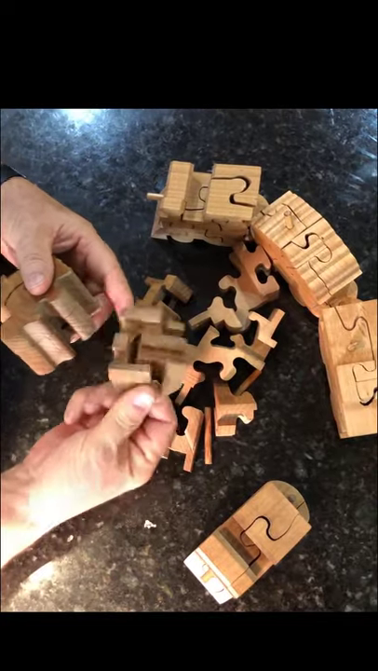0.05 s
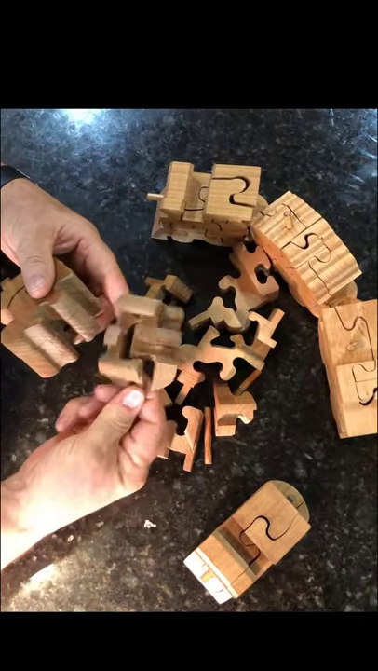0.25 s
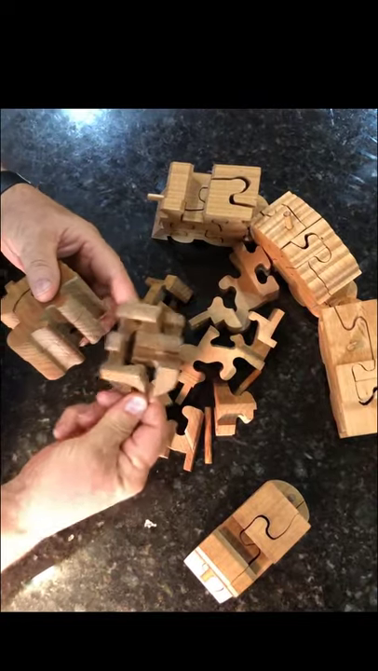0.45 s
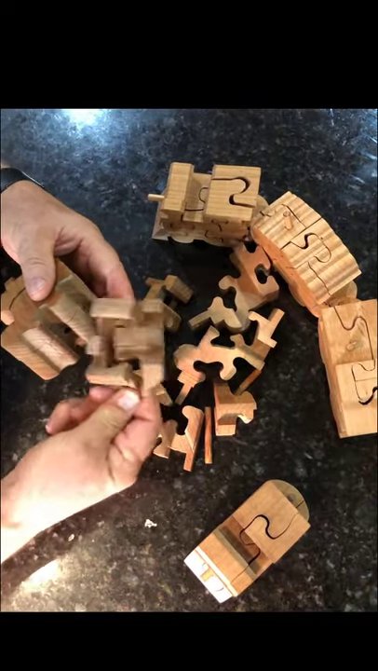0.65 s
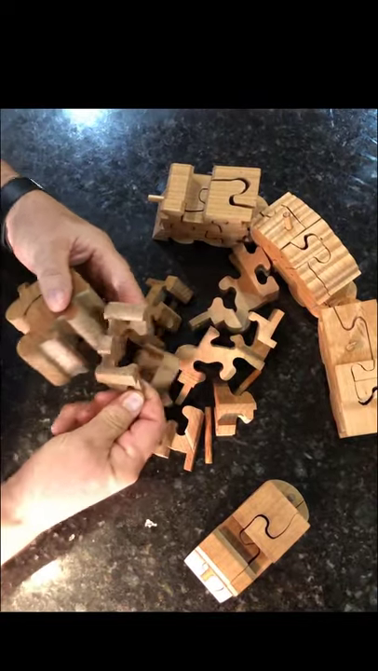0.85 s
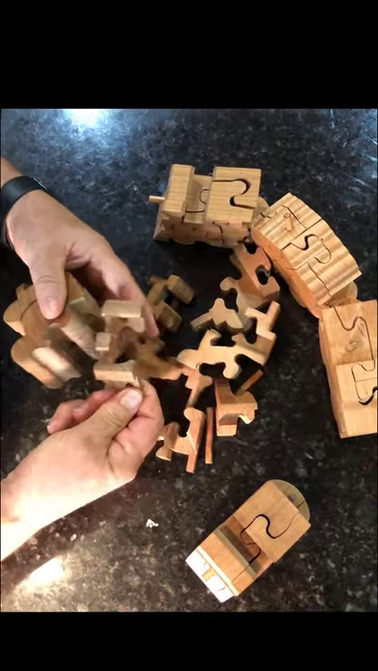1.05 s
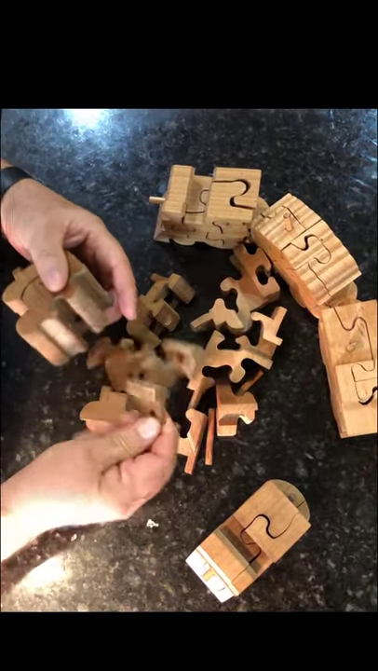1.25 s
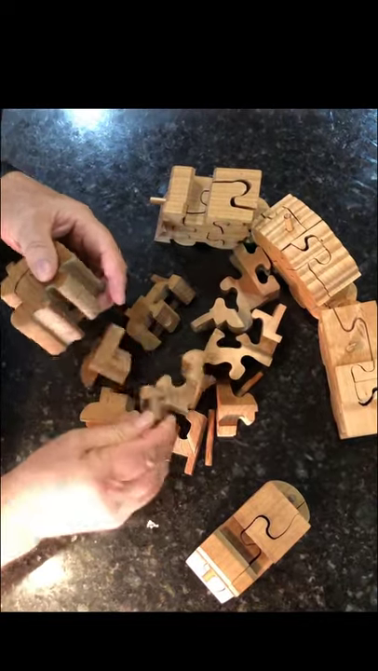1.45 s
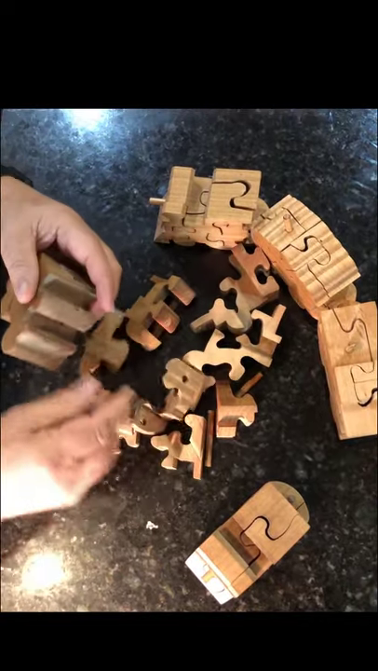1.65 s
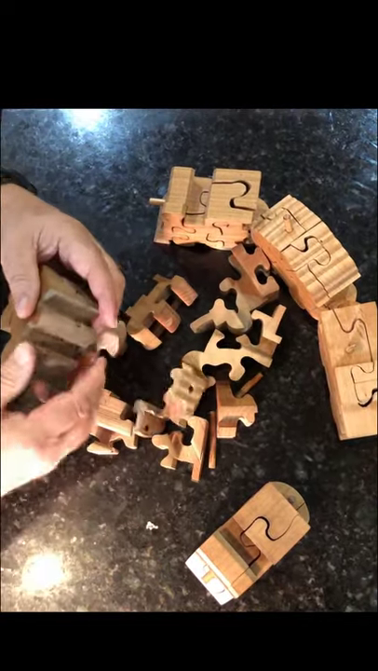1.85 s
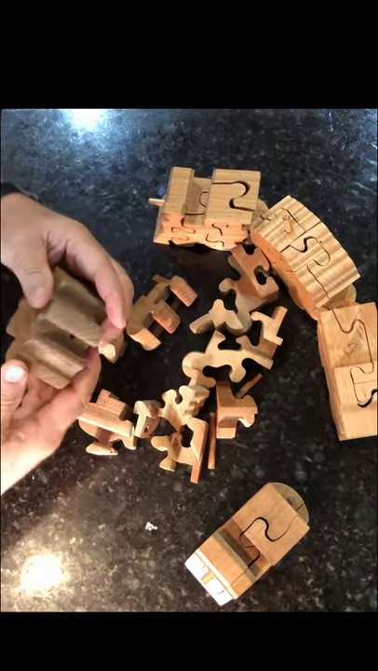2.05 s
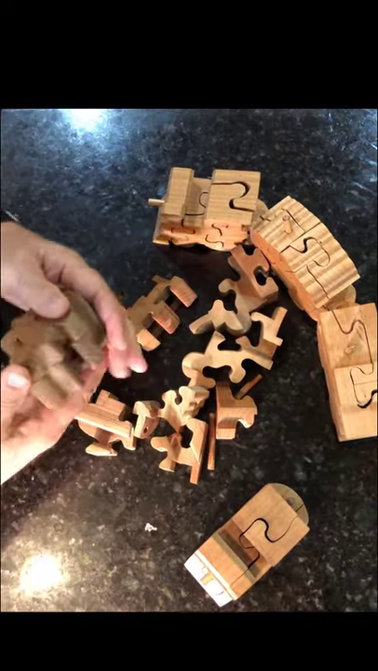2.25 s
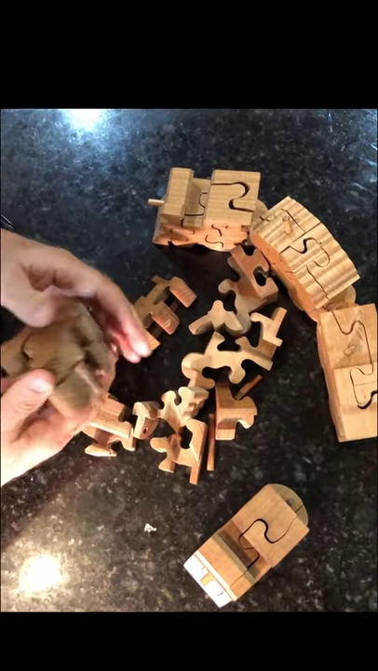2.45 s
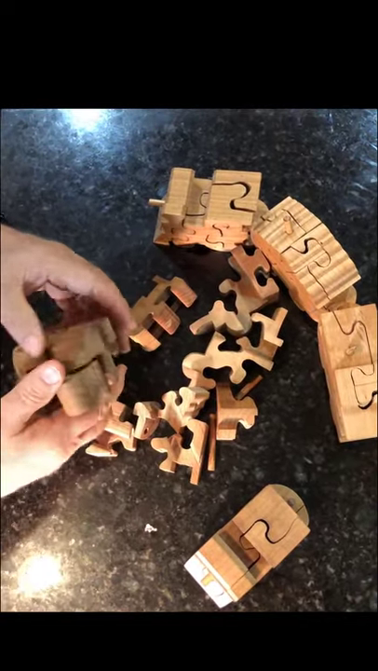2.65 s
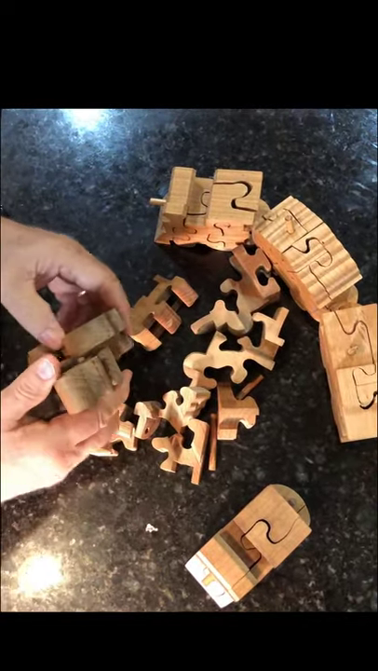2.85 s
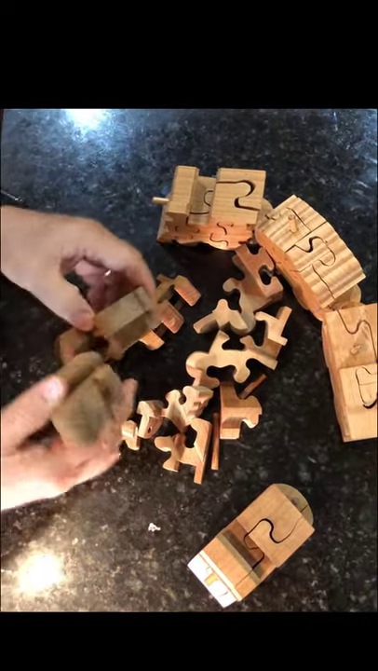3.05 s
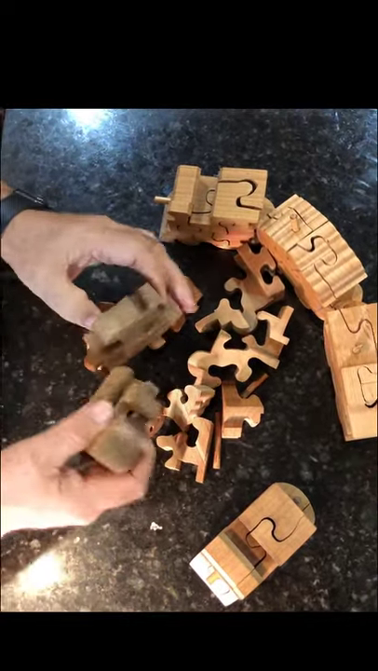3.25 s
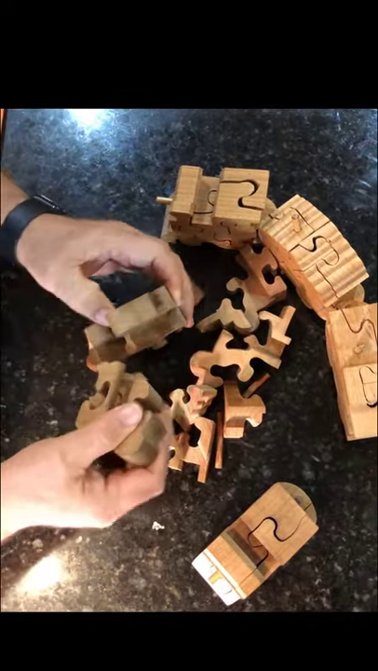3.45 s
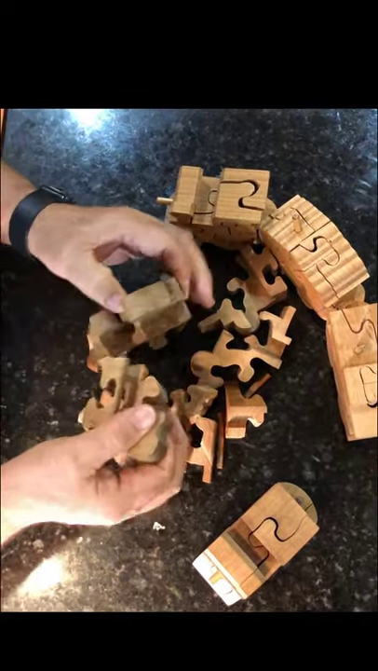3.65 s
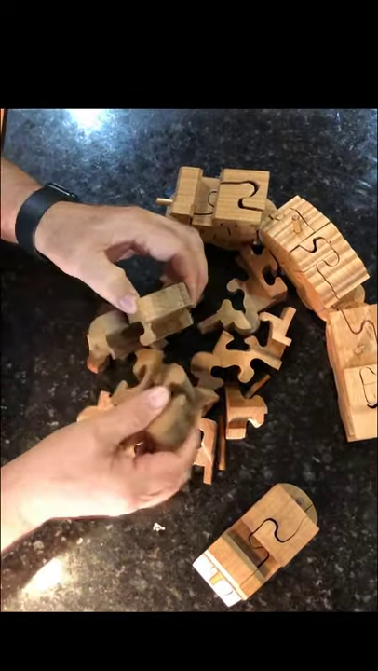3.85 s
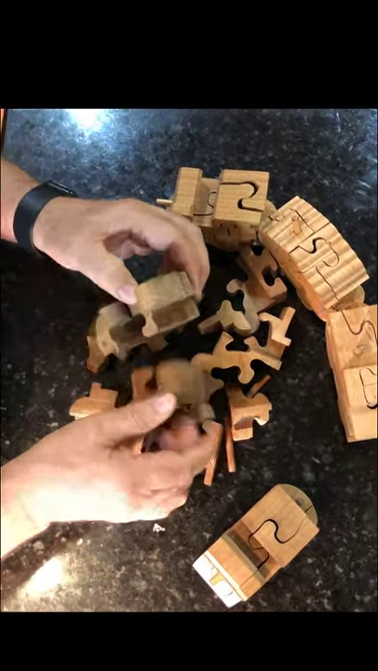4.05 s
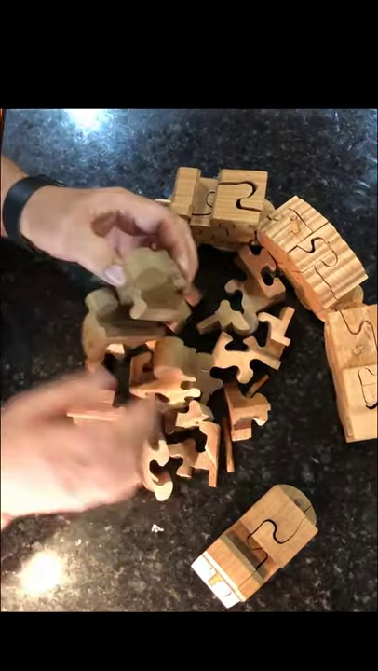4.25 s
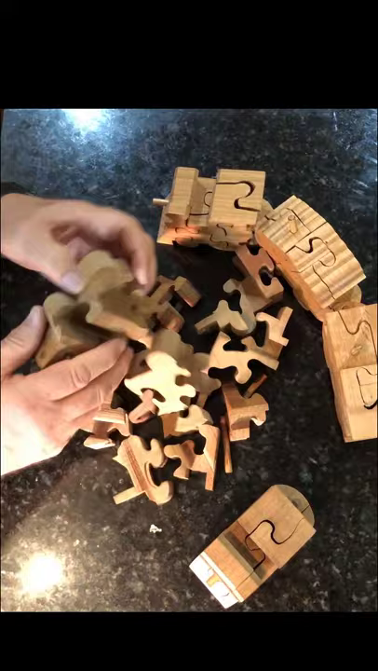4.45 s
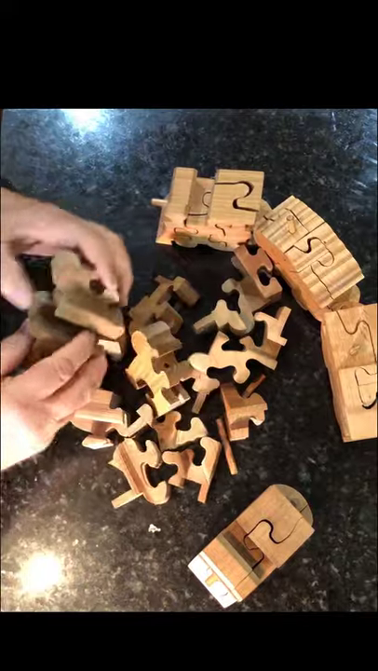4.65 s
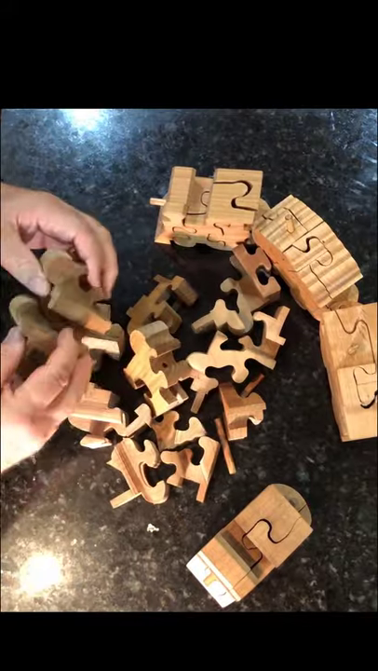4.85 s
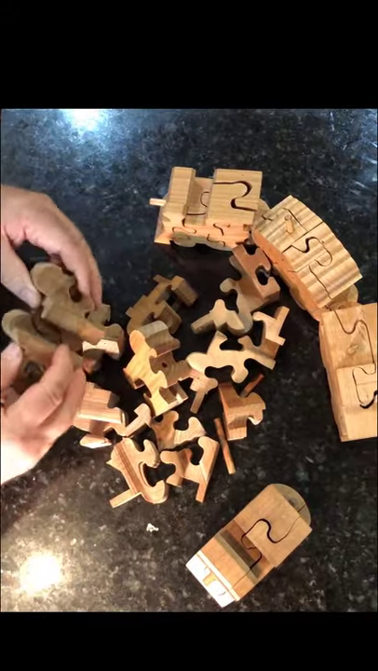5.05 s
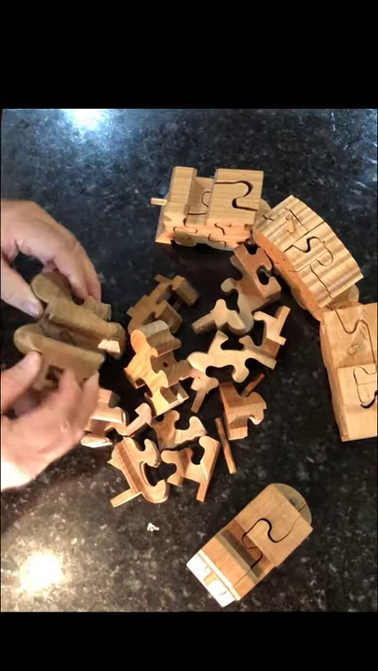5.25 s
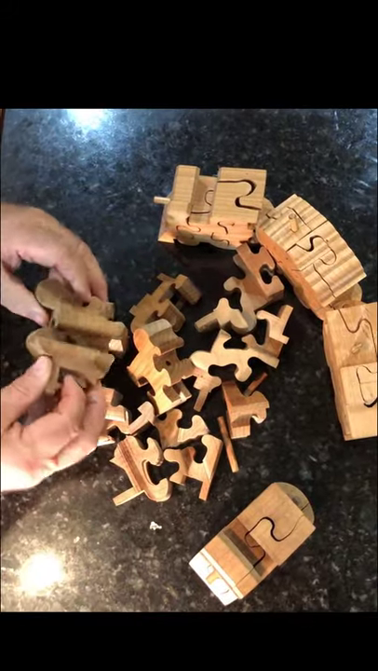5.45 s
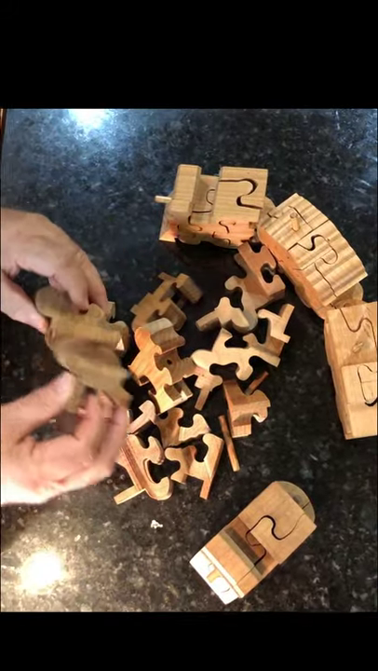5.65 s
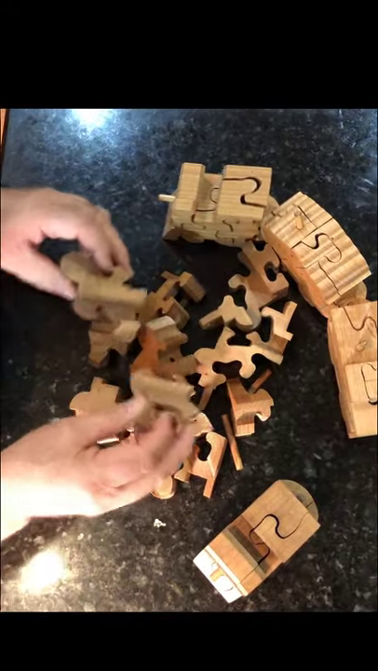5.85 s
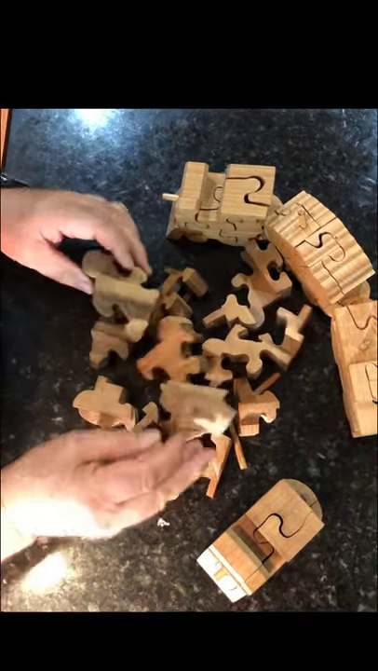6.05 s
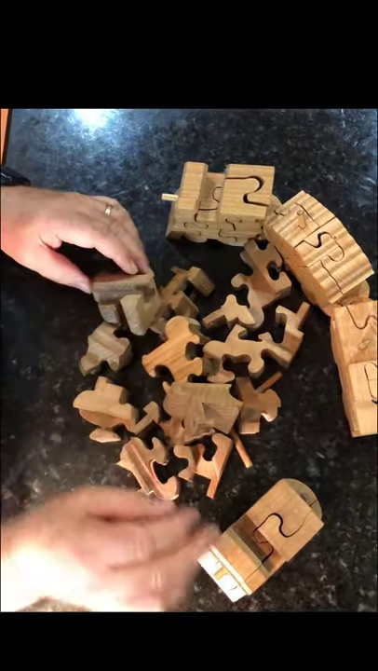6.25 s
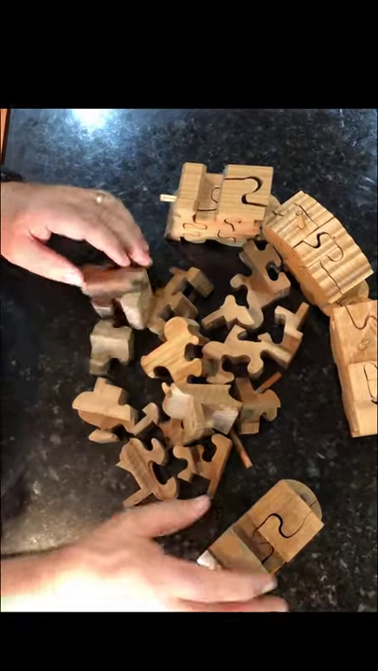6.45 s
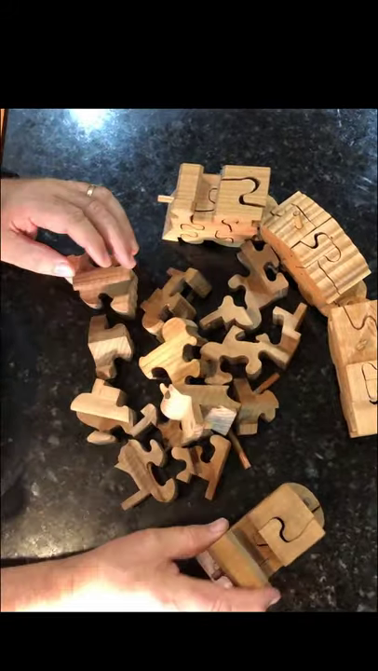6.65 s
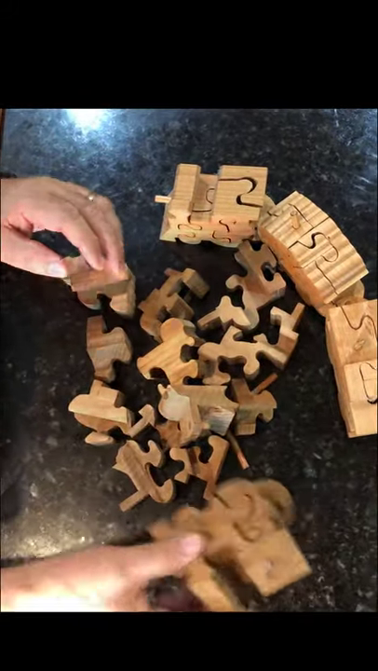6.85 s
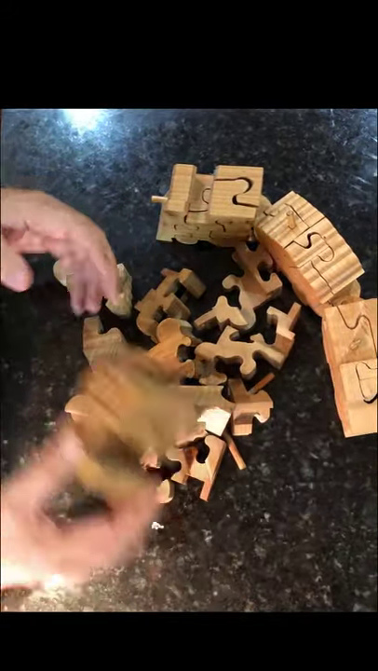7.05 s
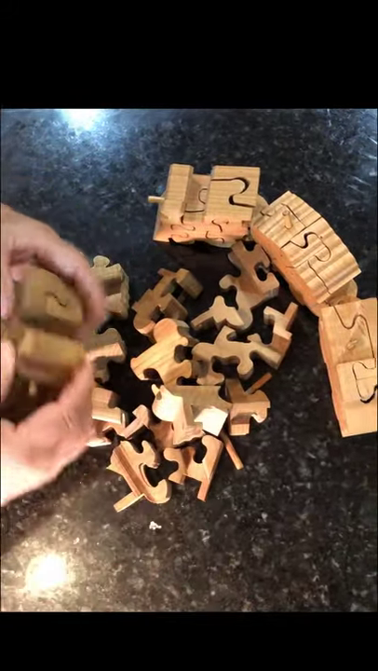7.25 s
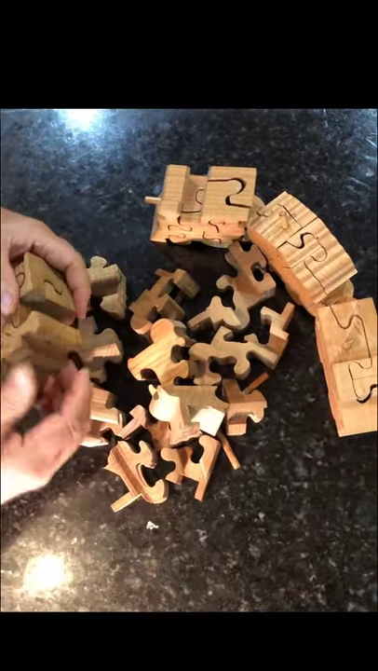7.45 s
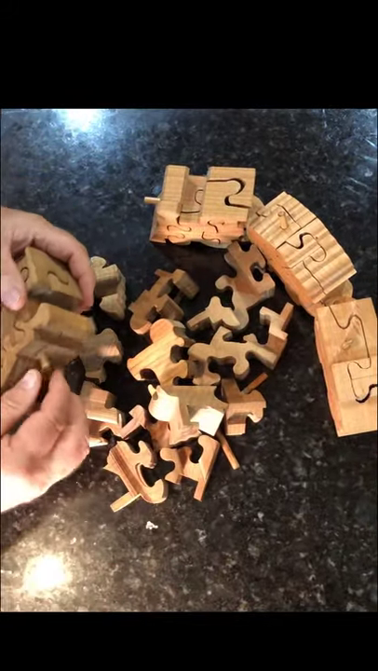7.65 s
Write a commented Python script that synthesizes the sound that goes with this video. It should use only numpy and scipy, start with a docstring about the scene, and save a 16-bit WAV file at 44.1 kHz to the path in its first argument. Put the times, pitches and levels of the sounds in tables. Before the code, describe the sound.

Hands take apart small wooden puzzle blocks over a stone countertop. Pieces fall with sharp, dry clacks and quick little rattles, separated by quiet fumbling and gritty rubbing. The busiest clatter comes around one, four and a half, and six to seven seconds. The hard room adds a short reverberation; a faint low hum and soft hush stay underneath, heard by a close phone microphone.

```python
"""At a stone counter in a hard room, small wooden puzzle pieces are pulled apart and dropped under a phone.
Each contact is a short noisy click plus the dying tones of the wood, and the room answers it.
In between, hands and pieces rub: gritty noise shaped by the piece that is held.
Behind it all are an appliance's low hum, made of narrow bands of noise, and the room's hush, a broad noise."""
import sys
import numpy as np
from scipy import signal
from scipy.fft import rfft, irfft, next_fast_len
from scipy.io import wavfile
from scipy.ndimage import uniform_filter1d, map_coordinates

SR = 44100
rng = np.random.default_rng(int(sys.argv[2]) if len(sys.argv) > 2 else 0)


def int16_out(signal):
    """Quantize to a 16-bit WAV file."""
    q = np.round(np.clip(np.atleast_2d(signal).T, -1, 1) * 32767)
    wavfile.write(sys.argv[1], SR, q.astype(np.int16))


N = 339570  # length of the scene in samples


def amp(db):
    """Turn a level in dB into a gain."""
    return 10 ** (np.asarray(db) / 20)


def unit(x):
    """Scale x to an rms (average strength) of 1."""
    return x / np.sqrt(np.mean(x ** 2) + 1e-20)


def along(points, hz):
    """Join (f/Hz, value) points by straight lines on a log frequency axis."""
    f, value = np.transpose(points)
    return np.interp(np.log(hz + 1), np.log(f + 1), value)


def filtered(x, response):
    """Filter x by multiplying its spectrum with a complex response of frequency."""
    size = next_fast_len(x.shape[-1] + 8192)
    spectrum = rfft(x, size) * response(np.fft.rfftfreq(size, 1 / SR))
    return irfft(spectrum, size)[..., :x.shape[-1]]


def resonance(f, hz, width):
    """Response of something that resonates at hz: gain 1 there, less on both sides."""
    return 1j * f * width / (hz * hz - f * f + 1j * f * width)


# The hush of the room as a spectrum shape: f/Hz, relative level/dB per Hz
HUSH_SHAPE = [(30, 3.5), (167, -11.5), (291, -9.5), (608, -23), (1310, -32.5), (14100, -48), (16500, -54)]


def hush():
    """The room's steady background: white noise shaped into a broad spectrum."""
    noise = rng.standard_normal(N)
    return amp(-49.5) * unit(filtered(noise, lambda f: amp(along(HUSH_SHAPE, f))))


# The low tones of the appliance: f/Hz, width of the resonance/Hz, rms level/dB
HUM_TONES = [(120.1, 4.7, -59.5), (170, 82, -56), (220.2, 8.3, -55), (590, 2.2, -71)]


def appliance():
    """A hum of wavering low tones: noise passed twice through each narrow resonance."""
    hum = np.zeros(N)
    for hz, width, db in HUM_TONES:
        tone = filtered(rng.standard_normal(N), lambda f: resonance(f, hz, width) ** 2)
        hum += amp(db) * unit(tone)
    return hum


# How long the room rings, by frequency: f/Hz, time to fall by 60 dB (t60)/s
ROOM_T60 = [(300, 0.66), (2100, 0.42), (5500, 0.4), (12000, 0.14)]
ROOM_DULL_HZ = 5000  # the room returns less treble than the direct path


def room_tails(count):
    """Room answers of energy 1: noise in which each frequency dies at its own speed."""
    noise = rng.standard_normal((count, SR // 2))
    hz, t, z = signal.stft(noise, SR, nperseg=256)
    hz = hz[:, None]
    decay = amp(-60 * t / along(ROOM_T60, hz))
    tails = signal.istft(z * decay / (1 + hz / ROOM_DULL_HZ), SR, nperseg=256)[1]
    seconds = np.arange(tails.shape[1]) / SR
    tails = tails * (1 - np.exp(-seconds / 0.0078))  # the walls take a while to answer
    return tails / np.linalg.norm(tails, axis=1, keepdims=True)


def wobble(rate):
    """A smooth random curve with rate random points a second."""
    points = rng.standard_normal(int(N * rate / SR) + 4)
    return map_coordinates(points, [np.arange(N) * rate / SR])


def patchy(depth_db):
    """White noise with patches of random gain in time and frequency."""
    z = signal.stft(rng.standard_normal(N), nperseg=256)[2]
    field = uniform_filter1d(rng.standard_normal(z.shape), size=5, axis=0)
    field = uniform_filter1d(field, size=12, axis=1)
    return signal.istft(z * amp(depth_db * unit(field)), nperseg=256)[1][:N]


def rubbing_grit():
    """Rough contact: patchy noise that swells and fades, plus sharp catches of edges."""
    grit = patchy(depth_db=2.5) * amp(2.5 * wobble(83))
    # edges catch now and then, at random, about 120 times a second
    catches = rng.standard_normal(N) * (rng.random(N) < 120 / SR)
    return grit + amp(23) * filtered(catches, lambda f: resonance(f, 1700, 4000) ** 2)


# Slides of wood or skin on wood (skin hisses, wood scrapes):
# start t/s, length/s, direct rms level/dB, ring f/Hz, hiss against scrape/dB
SLIDES = [(0.069, 0.085, -62, 6400, -11), (0.172, 0.2, -70.5, 6160, -8), (0.622, 0.68, -66, 5750, -5),
          (2.24, 0.044, -56.5, 3770, -36), (2.271, 0.32, -69.5, 3470, -28), (2.606, 0.44, -64, 3490, -20),
          (2.82, 0.075, -59.5, 2450, -13), (2.944, 0.091, -53.5, 2950, -38), (3.06, 0.27, -72, 3460, -26),
          (3.28, 0.14, -63, 3200, -25), (3.439, 0.22, -64, 3480, -20), (3.943, 0.13, -62.5, 4670, -15),
          (4.075, 0.32, -63, 4700, -17), (4.451, 0.11, -58.5, 3040, -6.5), (4.866, 0.11, -65, 2860, -4),
          (5.07, 0.29, -68.5, 3050, -20), (5.163, 0.046, -66, 4000, -12), (5.33, 0.12, -65.5, 4100, -16),
          (5.511, 0.093, -60, 2870, -15), (5.602, 0.069, -58, 4620, -20), (5.868, 0.17, -69.5, 6780, -1.5),
          (6.546, 0.18, -59, 2500, -17), (7.304, 0.1, -65.5, 4400, -16)]


def rubbing():
    """Each slide filters grit into a broad scrape, a fine hiss and the ring of the piece that is held."""
    out = np.zeros(N + SR)
    grit = rubbing_grit()
    # each grip leaves other faint modes (natural tones) free
    stirred_hz = rng.uniform(2000, 12000, size=(len(SLIDES), 9))
    for (s, length, db, ring_hz, hiss_db), modes_hz in zip(SLIDES, stirred_hz):
        start = round(s * SR)
        u = np.linspace(0, 1, round(length * SR))
        swell = np.sin(np.pi * u) ** 0.42
        stroke = np.pad(grit[start:][:len(u)] * swell, (0, 2048))

        def held_piece(f):
            """How the held piece colours the grit."""
            scrape = resonance(f, ring_hz, 4100)
            hiss = amp(hiss_db) * resonance(f, 10000, 11000) ** 2
            faint_modes = 1 + amp(3) * sum(resonance(f, hz, 260) for hz in modes_hz)
            squeak = amp(12.5) * resonance(f, ring_hz, 140)
            return (scrape + hiss) * faint_modes + squeak

        out[start:][:len(stroke)] += amp(db) * unit(filtered(stroke, held_piece))
    answer = signal.fftconvolve(out, room_tails(count=1)[0])
    return out[:N] + amp(-12.5) * answer[:N]


def burst(hz, width_hz, t60):
    """A blow and its dying chatter: fading noise in one broad band, peak 1."""
    t = np.arange(SR // 16) / SR
    noise = rng.standard_normal(len(t)) * amp(-60 * t / t60) * (1 - np.exp(-t / 0.000075))
    noise[12] += 7  # the first touch is the hardest
    band = filtered(noise, lambda f: resonance(f, hz, width_hz) ** 3)
    return band / np.abs(band).max()


# Modes (natural tones) the pieces ring with: f/Hz
WOOD_HZ = np.array([780, 1275, 1870, 2335, 2620, 2970, 3190, 3470, 3950, 4575, 5470])
# How long each of these modes takes to fall by 60 dB: t60/s
WOOD_T60 = [0.017, 0.013, 0.03, 0.045, .018, 0.04, 0.022, 0.016, 0.008, .03, 0.016]
# Some pieces ring in a chord; mode f/Hz -> its partners: f/Hz, level against the mode/dB
PARTNERS = {1275: [(786, -6), (2320, 1), (2830, -4.5)], 4575: [(6740, -8.5)], 2620: [(3900, -2), (5250, 1)],
            5470: [(6900, -1.5)], 3190: [(1960, -9), (3460, 3.5), (5410, -12)]}
PARTNER_T60 = 0.028  # s
# the other modes in a blow: level, loss per octave away from its pitch, random spread
OTHERS_DB, OTHERS_DB_PER_OCTAVE, OTHERS_SCATTER_DB = -19, -3, 3
OTHERS_DAMPING = 2.5  # they die this many times faster than their own t60


def wood_ring(pitch_hz, ring_db):
    """The wood's tones: the mode nearest the pitch, its partners, and the other modes faintly."""
    t = np.arange(SR // 16) / SR
    mode = np.argmin(np.abs(WOOD_HZ - pitch_hz))
    mode_hz, mode_t60 = WOOD_HZ[mode], WOOD_T60[mode]
    twin_hz = mode_hz + 2.5 * rng.standard_normal() / mode_t60  # a weaker neighbour roughens the ring
    pair = np.sin(2 * np.pi * mode_hz * t) + 0.7 * np.sin(2 * np.pi * twin_hz * t)
    ring = amp(ring_db - 60 * t / mode_t60) * pair
    for hz, partner_db in PARTNERS.get(int(mode_hz), []):
        ring += amp(ring_db + partner_db - 60 * t / PARTNER_T60) * np.sin(2 * np.pi * hz * t)
    octaves_away = np.abs(np.log2(WOOD_HZ / pitch_hz))
    scatter_db = OTHERS_SCATTER_DB * rng.standard_normal(len(WOOD_HZ))
    others_db = OTHERS_DB + OTHERS_DB_PER_OCTAVE * octaves_away + scatter_db
    for hz, t60, other_db in zip(WOOD_HZ, WOOD_T60, others_db):
        ring += amp(other_db - 60 * OTHERS_DAMPING * t / t60) * np.sin(2 * np.pi * hz * t)
    return ring


MID_DB, MID_HZ = -20, 3000  # a middling contact
# low knock under a contact: level for a middling one, change per dB of blow, change per octave of pitch
# (so there is less knock for harder blows and higher pieces)
KNOCK_DB, KNOCK_PER_DB, KNOCK_DB_PER_OCTAVE = -14.5, -0.5851, -3.5


def click(db, pitch_hz, treble_db, ring_db):
    """One contact of peak 1: wood tones over a noisy rattle, a low knock and a bright edge."""
    body_hz = pitch_hz * (3500 / pitch_hz) ** 0.33  # pieces that ring high rattle high, and briefly
    rattle = burst(body_hz, body_hz, t60=45 / body_hz)
    body = amp(-6.0) * (wood_ring(pitch_hz, ring_db) + rattle)
    octaves_up = np.log2(pitch_hz / MID_HZ)
    knock_db = KNOCK_DB + KNOCK_PER_DB * (db - MID_DB) + KNOCK_DB_PER_OCTAVE * octaves_up
    knock = amp(knock_db) * burst(hz=1120, width_hz=2970, t60=0.095)
    bright = burst(hz=5930, width_hz=4800, t60=0.018)
    brightest = burst(hz=12530, width_hz=11000, t60=0.028)
    edge = amp(treble_db) * (bright + amp(-14) * brightest)
    sound = body + knock + edge
    return sound / np.abs(sound).max()


# after a blow the piece rocks: mean wait between small touches, their level and their fading
SETTLE_S, SETTLE_DB, SETTLE_FADE_DB_PER_S = 0.012, -15.5, -220


def rocking():
    """The blow itself as a pulse of 1, then up to four weaker touches at random waits."""
    touches = np.zeros(SR // 4)
    times = np.cumsum(rng.exponential(SETTLE_S, size=4)) * SR
    places = np.minimum(times, len(touches) - 1).astype(int)
    touches[places] = amp(SETTLE_DB + SETTLE_FADE_DB_PER_S * places / SR)
    touches[0] = 1
    return touches


# Contacts, bright on stone and dull on wood; free pieces ring, gripped ones do not:
# t/s, peak level of the first blow/dB, pitch f/Hz, treble level in the mix/dB, ring against rattle/dB
CONTACTS = [(0.758, -41.5, 5600, -28, -17.5), (0.84, -39.5, 4000, -2.5, -0.5), (.866, -36.5, 5470, -8.5, 7),
            (0.918, -37, 5540, -5.5, 4.5), (0.9665, -13.5, 4550, -45, -8.5),
            (0.9657, -18.5, 968, -30, -2.5), (1.016, -16, 4540, -28, -1.5), (1.0507, -23, 4320, -26.5, -8),
            (1.1331, -7, 3200, 1.5, 0), (1.153, -21, 3410, -31, 11), (1.1598, -21, 3220, -23, 6),
            (1.1679, -11.5, 3150, -4, -4), (1.187, -17.5, 3140, -8, -8.5), (1.205, -27.5, 3180, -29, -2),
            (1.464, -31, 5870, -1, -15), (1.627, -36, 1900, -8, -26), (1.652, -40, 4500, -20, -13),
            (1.704, -29, 2370, -9.5, -14), (1.793, -28.5, 3100, -30.5, -43), (1.799, -26, 3290, -28, -11),
            (1.823, -20, 3340, -9.5, -7.5), (1.839, -22.5, 3470, -9.5, -1), (2.033, -30, 2320, -11, -25),
            (2.102, -32.5, 3470, -30, -7), (2.506, -46, 1870, -25, -8), (2.618, -28.5, 3420, -25, 2.5),
            (2.734, -43.5, 1275, -33, 2), (2.867, -44, 1275, -25, -10), (3.395, -38, 1880, -7, 2),
            (3.656, -5, 2520, -7.5, -7), (3.689, -16, 4300, -16, -16.5), (3.718, -27, 3020, -28, -36),
            (3.95, -39, 1890, -4.5, -8), (4.016, -39, 4520, -23, -20), (4.079, -39.5, 4540, -7, -9.5),
            (4.092, -37.5, 3470, -9.5, -15), (4.102, -27.5, 1900, -3.5, -32.5),
            (4.1612, -16.5, 2800, -32, -13.5), (4.175, -18.5, 3550, -35, -6),
            (4.239, -20.5, 1964, -13.5, -17.5), (4.265, -26.5, 1820, -12.5, -21),
            (4.394, -15.5, 2880, -12, -30.5), (4.556, -24, 4960, -20, -10.5), (4.566, 0, 5380, 2.5, -28.5),
            (4.5693, -14, 3370, -8, -14), (4.621, -20, 3550, -28, -2), (4.69, -8, 1390, -31.5, -10.5),
            (4.748, -16.5, 1410, -15.5, -4), (4.77, -28.5, 1260, -25, -1), (4.871, -30.5, 2230, -40, -12),
            (5.603, -36.5, 777, -19, 6), (5.936, -25, 786, -6, 8.5), (5.999, -34, 760, -28, 4),
            (6.0618, -5, 3500, -5, -11), (6.07, -15.5, 2180, -40.5, -23), (6.102, -23, 1460, -32, -18),
            (6.141, -20, 1670, -36.5, -17), (6.185, -22.5, 2300, -33, -7), (6.2181, -6.5, 3600, -15.5, -7),
            (6.2531, -11, 1850, -4, -16), (6.283, -25, 1870, -15.5, -19), (6.307, -20, 4030, -7.5, -22),
            (6.513, -19.5, 3390, -38.5, -2.5), (6.525, -24.5, 3870, -22.5, -5),
            (6.622, -30, 1275, -24.5, -14.5), (6.648, -33, 2320, -12, -20.5), (6.68, -12.5, 4550, -6.5, 0),
            (6.684, -5.5, 2300, -1.5, -12.5), (6.699, -12.5, 5500, -4.5, -5),
            (6.742, -10.5, 2240, -3, -11.5), (6.7479, -9.5, 5400, -4.5, -8)]


def pieces():
    """Every contact clicks and rocks, and gets its own answer from the room."""
    out = np.zeros(N + SR)
    for (s, db, *colour), tail in zip(CONTACTS, room_tails(count=len(CONTACTS))):
        start = round(s * SR)
        near = signal.fftconvolve(amp(db) * click(db, *colour), rocking())
        far = amp(-14.0) * signal.fftconvolve(near, tail)
        out[start:][:len(near)] += near
        out[start:][:len(far)] += far
    return out[:N]


def scene():
    """Everything at the one microphone."""
    return (hush() + appliance() + rubbing() + pieces())[None]


TOP_HZ = 16500  # band limit of the microphone


def record(dry):
    """The phone's microphone drops the deepest bass and keeps nothing above its band limit."""
    return filtered(dry, lambda hz: (hz < TOP_HZ) * (1j * hz / (42 + 1j * hz)) ** 6)


dry = scene()
out = record(dry)
int16_out(out)
```